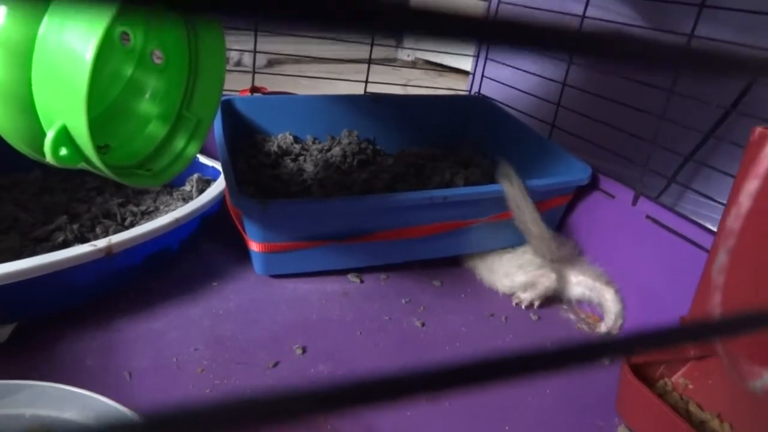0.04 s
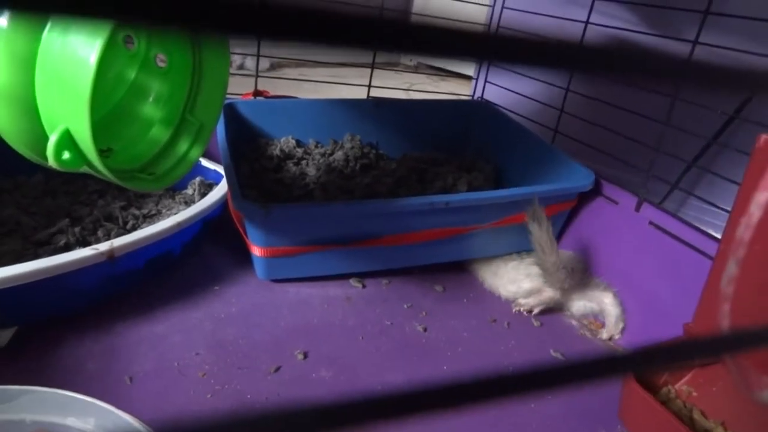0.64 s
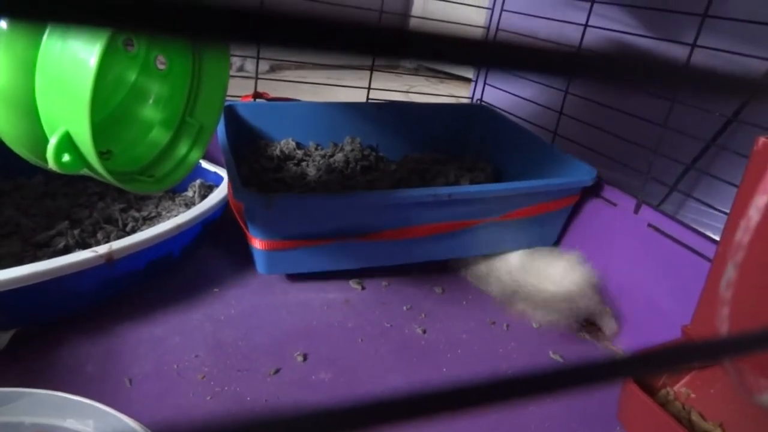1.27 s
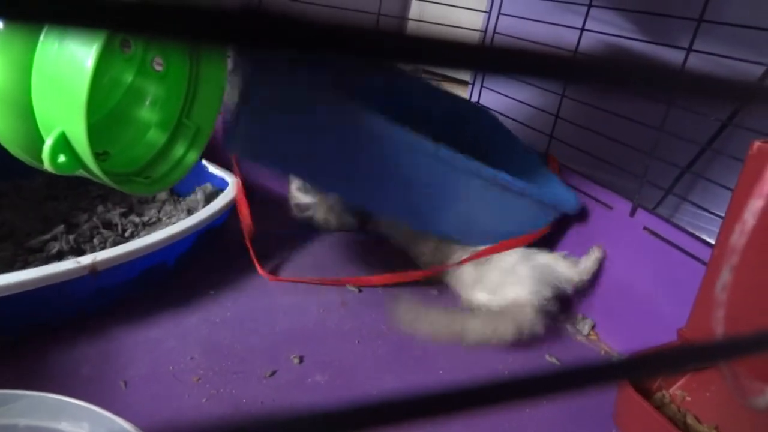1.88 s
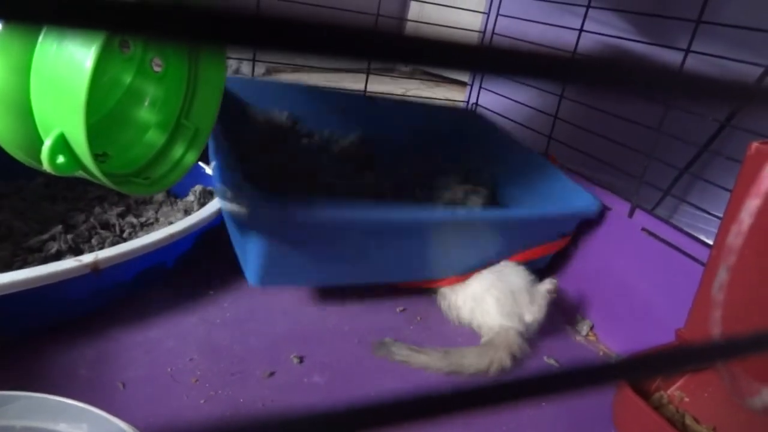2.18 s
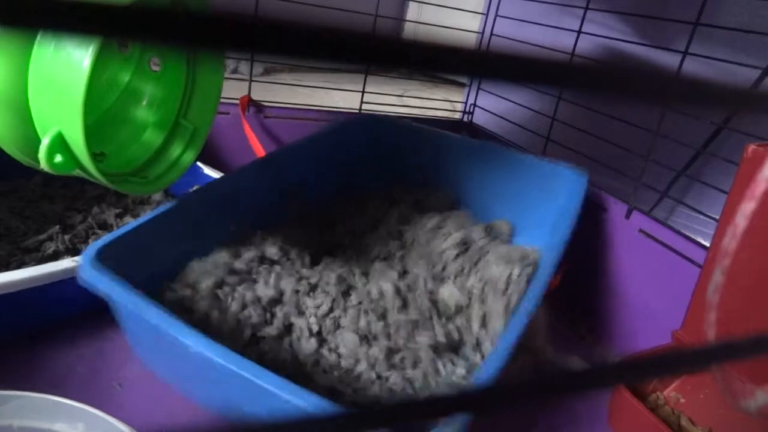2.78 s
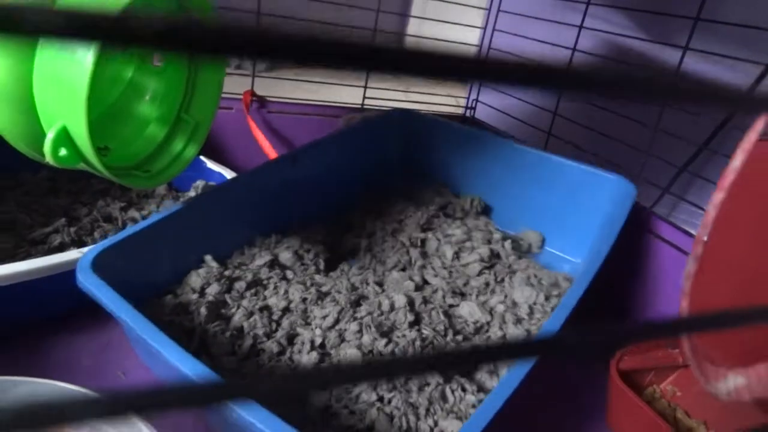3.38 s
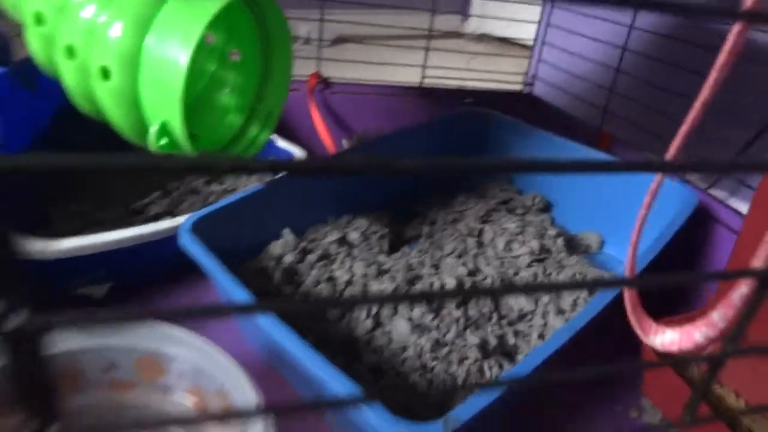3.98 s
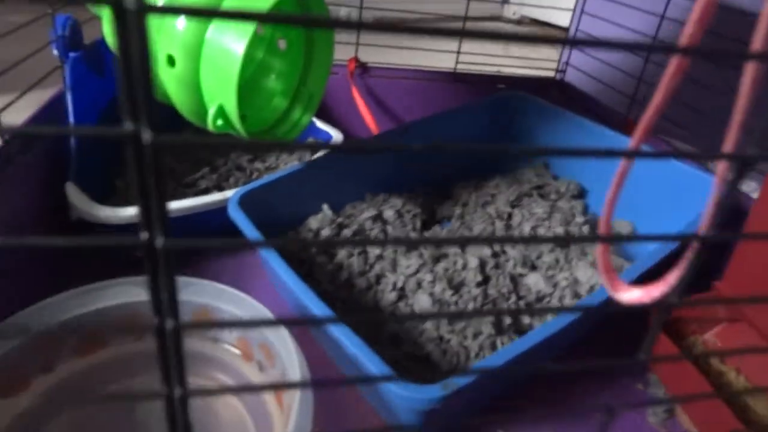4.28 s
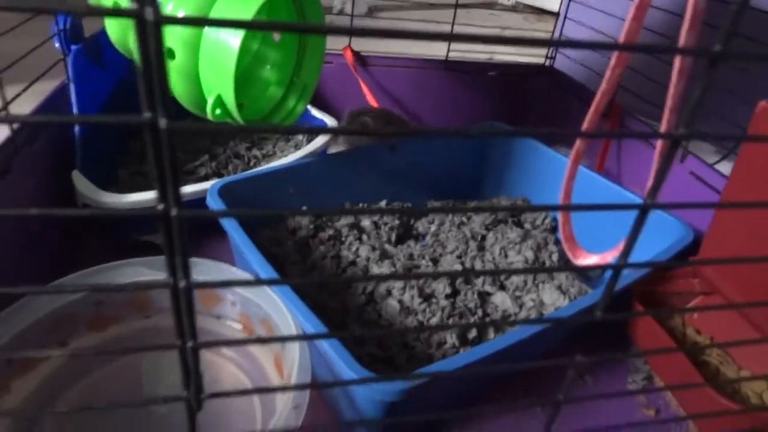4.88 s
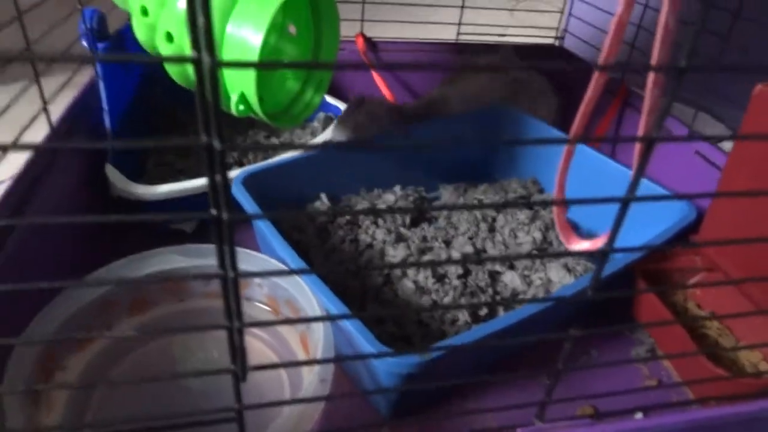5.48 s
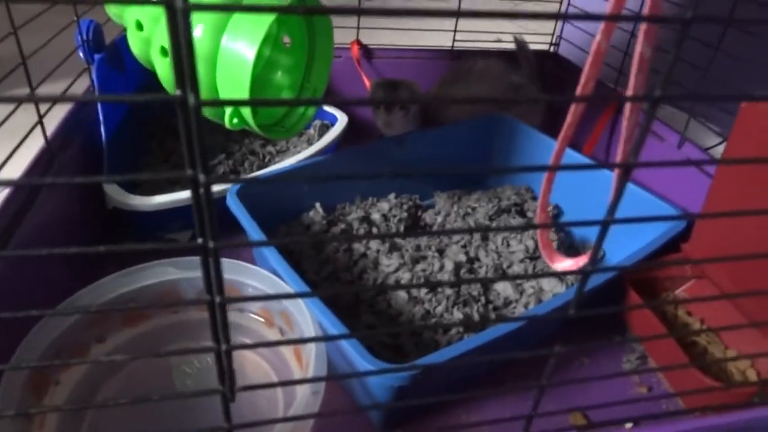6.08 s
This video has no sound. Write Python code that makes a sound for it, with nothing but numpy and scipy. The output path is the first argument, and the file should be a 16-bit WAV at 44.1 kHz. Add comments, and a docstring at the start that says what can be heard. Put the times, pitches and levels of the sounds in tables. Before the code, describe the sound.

A close microphone faces a wire cage in a fairly live room with a faint low hum. For the first 1.4 seconds a ferret's claws scratch lightly on the hollow cage floor and its body brushes a plastic litter tray. From about 1.4 to 2.1 seconds the tray gives dull knocks and small scrapes as it lifts. Between 2.1 and 3 seconds comes the loudest part: the tray drops, tips and skids, with sharp cracks, three heavy hollow knocks, juddering and rustling paper litter. It settles into scattered pellet ticks, soft knocks and short wire taps until about 4.2 seconds. From 4.2 to 4.9 seconds another shove makes the tray stick and slip over grit, with rim clacks and more rustling. Faint scraping, trickling litter, a brush and one small knock around 5.5 seconds fade away by 6 seconds.

```python
"""A plastic litter tray knocks and judders in a wire cage as a ferret squirms under it, lifts it, lets it
tumble and shoves it along. The tray sticks and slips on the gritty cage pan and cracks its rim on the cage;
paper litter rustles and ticks inside it. Claws scratch the hollow pan, dry taps sound on the bars near the
microphone, and the ferret's body brushes the plastic. A close stereo microphone stands just outside the bars,
facing the cage, in a fairly live room with a faint hum."""
import sys
import numpy as np
from scipy import signal
from scipy.fft import rfft, irfft, next_fast_len
from scipy.io import wavfile
from scipy.ndimage import uniform_filter1d, minimum_filter1d

SR = 44100
rng = np.random.default_rng(int(sys.argv[2]) if len(sys.argv) > 2 else 0)


def store_pcm(level_fs):
    """Save levels as 16-bit WAV."""
    pcm = np.round(np.clip(level_fs, -1, 1) * 32767).astype(np.int16)
    wavfile.write(sys.argv[1], SR, np.atleast_2d(pcm).T)


N = 270774
T = np.arange(N) / SR

# spectrum of a small, bright tick: frequency_hz, level_db
TICK_SPECTRUM = [(3000, -4), (6000, 4.5), (7500, 5), (10000, 4), (13000, 5.5), (16000, -6.5)]


def from_db(db):
    """Decibels to gain."""
    return 10 ** (np.asarray(db) / 20)


def rms_one(x):
    """Scale to unit rms."""
    return x / np.sqrt(np.mean(x ** 2) + 1e-20)


def peak_one(x, size=180):
    """Scale so that the loudest few milliseconds have unit rms."""
    return x / np.sqrt(uniform_filter1d(x * x, size).max())


def steady(x, size=1300):
    """Hold the strength of a sound even over a few hundredths of a second."""
    return x / np.sqrt(uniform_filter1d(x * x, size) + 1e-9)


def add(track, start_s, sound):
    """Mix a sound into a track."""
    start = max(round(start_s * SR), 0)
    track[..., start:start + sound.shape[-1]] += sound[..., :N - start]


def at_hz(points, hz):
    """Read a table on a log-frequency axis."""
    frequencies, values = np.transpose(points)
    return np.interp(np.log(np.maximum(hz, 1)), np.log(frequencies), values)


def colour(x, spectrum, size=4096):
    """Causal (minimum-phase) filter with the given spectrum and unit energy."""
    gain = from_db(at_hz(spectrum, np.fft.rfftfreq(size, 1 / SR)))
    cepstrum = irfft(np.log(gain))
    cepstrum[1:size // 2] *= 2
    cepstrum[size // 2 + 1:] = 0
    response = irfft(np.exp(rfft(cepstrum)))
    return signal.oaconvolve(x, response / np.linalg.norm(response))[:len(x)]


def resonate(x, hz, width_hz):
    """Two-pole resonance with gain 1 on top."""
    radius = np.exp(-np.pi * width_hz / SR)
    feedback = [1, -2 * radius * np.cos(2 * np.pi * hz / SR), radius ** 2]
    return signal.lfilter(np.array([1, 0, -1]) * (1 - radius ** 2) / 2, feedback, x + 1e-18)


def grains(per_s, spread_db, clump_db, clumps_per_s):
    """Tiny slips of uneven, bounded size that come in clumps; rms 1."""
    size_db = spread_db * rng.exponential(1, N)
    size_db += clump_db * np.interp(T * clumps_per_s, np.arange(N), rng.standard_normal(N))
    sizes = rng.choice([-1, 1], N) * from_db(np.minimum(size_db, 13))
    return rms_one(sizes * (rng.random(N) < per_s / SR))


def burst(t60, attack_s=0.0012, size=8192):
    """The dying chatter of one contact."""
    t = T[:size]
    return rng.standard_normal(size) * from_db(-60 * t / max(t60, .003)) * (1 - np.exp(-t / attack_s))


def strike(spectrum, t60):
    """One contact in two rows: the direct chatter, and a pulse of equal energy that excites the room."""
    direct = peak_one(colour(burst(t60), spectrum))
    pulse = colour(signal.unit_impulse(len(direct)), spectrum)
    return np.array([direct, np.linalg.norm(direct) * pulse])


def stroke(start, held, swell_s, fade_s):
    """A movement swells to full strength at its start time, holds and fades."""
    return np.exp(-np.maximum(start - T, 0) / swell_s - np.maximum(T - start - held, 0) / fade_s)


def room_tone(air_db=-49.5, hum_db=-51.5, hum_hz=119.6, waver_hz=5.7):
    """Soft room noise and a wavering hum."""
    # spectrum of the quiet room: frequency_hz, level_db
    air_spectrum = [(25, -46), (55, 3.5), (90, -4), (130, 3), (260, -5), (700, -15), (2000, -24.5),
                    (16000, -38)]
    hum = from_db(hum_db) * steady(resonate(rng.standard_normal(N), hum_hz, waver_hz))
    return from_db(air_db) * colour(rng.standard_normal(N), air_spectrum) + hum


def motion(floor_db=(-47, -58, -63.5), push_rustle_db=-10.5, settle_db=-19.5, settle_s=0.35):
    """Strength of pushes, spills and tumbles over a faint, steady floor; rows (judder, scrape, rustle)."""
    # the ferret pushes and the tray slides: full_force_s, held_s, judder_db, scrape_db
    pushes = [(0.14, 0.036, -40, -53), (0.84, 0.022, -37, -44.5), (1.16, 0.2, -39, -55),
              (1.5, 0.12, -43.5, -48.5), (1.849, 0.018, -27.5, -33), (3.6, 0.017, -34.5, -42.5),
              (3.88, 0.022, -32.5, -42), (4.412, 0.087, -16.5, -29.5), (4.53, 0.027, -20, -23),
              (4.74, .05, -36, -36), (5.04, 0.35, -43.5, -48)]
    # litter shifts and trickles: start_s, held_s, rustle_db
    spills = [(1.728, 0.27, -45.5), (2.053, 0.064, -48), (3.727, 0.056, -51), (4.02, .06, -49),
              (4.246, 0.52, -36), (4.912, 0.68, -47)]
    # the tray drops, tips and skids: start_s, judder_db, scrape_db, rustle_db, held_s, t60_s
    tumbles = [(2.169, -13.5, -20, -23.5, 0.059, 0.38), (2.434, -18.5, -31, -55, 0.045, 0.062),
               (2.498, -7.5, -23.5, -34.5, .11, 0.079), (2.655, -16.5, -25.5, -39, 0.064, 0.18),
               (2.808, -7, -22, -26.5, 0.071, 0.38)]
    power = np.outer(from_db(floor_db), np.ones(N)) ** 2
    for start, held, judder_db, scrape_db in pushes:
        force = stroke(start, held, swell_s=0.053, fade_s=0.11)
        power += np.outer(from_db([judder_db, scrape_db, scrape_db + push_rustle_db]), force) ** 2
    for start, held, rustle_db in spills:
        power[2] += (from_db(rustle_db) * stroke(start, held, swell_s=0.015, fade_s=0.02)) ** 2
    for start, judder_db, scrape_db, rustle_db, held, t60 in tumbles:
        after = np.maximum(T - start - held, 0)
        settling = from_db(settle_db) * np.exp(-after / settle_s)
        shape = (T >= start) * np.maximum(from_db(-60 * after / t60), settling)
        power += np.outer(from_db([judder_db, scrape_db, rustle_db]), shape) ** 2
    return np.sqrt(power)


def tray(force, wall_db=-25):
    """The tray rings in its modes over the broad, damped response of its walls."""
    # resonances of the tray on the cage pan: pitch_hz, width_hz, level_db
    modes = [(221.8, 19, 5), (277, 11.5, 0), (344.6, 9.1, 8.5), (403.6, 15.2, 4.5), (459.6, 10.6, 2),
             (530, 35, -2.5), (590.7, 21.3, 2.5), (678, 39, -2.5), (758, 10.6, 2.5), (797, 4.6, -1),
             (873, 46, -12.5), (977, 25, -11), (1085, 8.1, -20), (1166, 17, -5.5)]
    # response of the plastic walls: frequency_hz, level_db
    wall_spectrum = [(40, -35), (80, -17.5), (140, -17), (200, -10.5), (550, -4), (900, 1.5), (1300, -1.5),
                     (2500, -20), (6000, -115)]
    ring = sum((-1) ** k * from_db(db) * resonate(force, hz, width)
               for k, (hz, width, db) in enumerate(modes))
    return ring + from_db(wall_db) * colour(force, wall_spectrum)


def rim(scrape, width_hz=40):
    """Grit under the tray also sets the rim ringing."""
    # stiff upper modes of the rim: pitch_hz, gain_db
    modes = [(1400, -19), (1824, -17), (2126, -8), (2660, 2.5), (3170, -32), (3493, -2), (4215, 0)]
    return scrape + sum(from_db(db) * resonate(scrape, hz, width_hz) for hz, db in modes)


def sliding(judder_db=-6.0, scrape_db=-5.5, rustle_db=-7.0, crackle_db=-13.0):
    """Stick and slip shakes the tray, grit scratches the pan, pellets roll and snap on each other."""
    # spectra of grit on the pan and of paper litter: frequency_hz, level_db
    scrape_spectrum = [(400, -9), (1100, 2.5), (1500, 4.5), (2100, 4), (3100, 0), (5600, -6.5),
                       (8000, -31.5), (16000, -40)]
    rustle_spectrum = [(2500, -32), (5000, -12), (6400, 10.5), (8000, 9.5), (11000, 7), (15500, 3)]
    shaking, scraping, stirring = motion()
    slips = grains(per_s=1000, spread_db=4.0, clump_db=6.0, clumps_per_s=90)
    grit = grains(per_s=6000, spread_db=2.0, clump_db=2.0, clumps_per_s=170)
    crackle = from_db(crackle_db) * grains(per_s=80, spread_db=4.0, clump_db=-6.0, clumps_per_s=7.7)
    judder = steady(tray(slips), size=900)
    scrape = steady(rim(colour(grit, scrape_spectrum))) + colour(crackle, scrape_spectrum)
    rustle = steady(colour(grit, rustle_spectrum)) + colour(crackle, rustle_spectrum)
    return (from_db(judder_db) * shaking * judder
            + from_db(scrape_db) * scraping * scrape
            + from_db(rustle_db) * stirring * rustle)


def stray_pellets(level_db=-52, stir_exponent=0.41, t60=0.018):
    """Single pellets drop at random, the louder the more the litter is stirred."""
    rustle = motion()[2]
    drops = grains(per_s=55, spread_db=3.5, clump_db=-1.5, clumps_per_s=36)
    stirred = (rustle / rustle.max()) ** stir_exponent
    ticks = signal.oaconvolve(drops * (stirred - stirred.min()), burst(t60, attack_s=0.00038))[:N]
    return from_db(level_db) * rms_one(colour(ticks, TICK_SPECTRUM))


def click(treble_db, body_db, t60):
    """A hard contact: a clack of plastic, a bright tick and a hollow note of the cage pan."""
    # spectra of struck plastic and of the pan: frequency_hz, level_db
    clack_spectrum = [(400, -1.5), (1200, 2.5), (2200, 1.5), (3300, 6), (4500, 1.5), (6500, -1.5),
                      (9000, -11), (16000, -24.5)]
    pan_spectrum = [(80, -16.5), (200, -1.5), (320, 0.5), (430, 0.5), (600, 8.5), (800, 2), (1100, -5),
                    (2500, -7), (6000, -52.5)]
    clack = from_db(-4.5) * strike(clack_spectrum, t60)
    tick = from_db(treble_db + 3.5) * strike(TICK_SPECTRUM, 0.87 * t60)
    thud = from_db(body_db + 2.5) * strike(pan_spectrum, t60)
    return clack + tick + thud


def hard_contacts():
    """Claws, pellets and the rim each click with a touch of their own; rows (direct, to the room)."""
    # claws scratch on the hollow pan: start_s, level_db, t60_s
    scratches = [(0.054, -34, .018), (0.1326, -35, 0.092), (0.3414, -44, 0.089), (0.3561, -38.5, 0.023),
                 (0.5457, -40.5, 0.13), (0.7791, -44, 0.3), (0.8604, -36, 0.058), (2.501, -27.5, 0.036),
                 (3.0704, -37.5, 0.04), (3.3946, -30.5, 0.032), (4.2463, -37, 0.18), (4.2839, -31.5, 0.095),
                 (5.458, -41, 0.16)]
    # loose pellets tick on the plastic: start_s, level_db, treble_db
    pellets = [(1.4839, -36, 2), (1.8426, -33.5, -7), (3.372, -31, -7.5), (3.682, -35, -7),
               (3.7301, -25.5, -1), (3.7995, -39, 9.5), (3.813, -30.5, -5), (4.798, -37, 5.5),
               (4.859, -27, -7), (4.9548, -33, -6.5), (5.2426, -35, -11)]
    # the tray's rim cracks against the cage: start_s, level_db, body_db
    cracks = [(1.7422, -22, -4), (1.8048, -29, 3), (2.0941, -18, -21), (2.0999, -15, -28),
              (2.16, -1.5, -11.5), (2.614, -7, 0.5), (2.7996, -12, -7), (2.8907, -18.5, 6),
              (4.366, -16.5, -9.5), (4.435, -30, 5), (4.5088, -15.5, -5.5), (4.535, -22, 0),
              (4.6817, -21.5, -7.5)]
    out = np.zeros((2, N))
    for start, db, t60 in scratches:
        add(out, start, from_db(db) * click(treble_db=-6, body_db=-1.5, t60=t60))
    for start, db, treble_db in pellets:
        add(out, start, from_db(db) * click(treble_db, body_db=-16, t60=0.017))
    for start, db, body_db in cracks:
        add(out, start, from_db(db) * click(treble_db=-18, body_db=body_db, t60=0.031))
    return out


def wire_taps(gain_db=1.5, t60=0.023):
    """Short, damped taps on the cage bars close to the microphone; rows (direct, to the room)."""
    # dry taps on the cage: start_s, level_db
    taps = [(0.0997, -43), (0.71, -40), (1.5486, -44), (1.6817, -30), (3.6164, -26.5), (4.0142, -33.5),
            (4.064, -39), (4.1127, -25.5), (4.1905, -31), (4.574, -25), (4.586, -26.5), (4.7684, -30.5)]
    # spectrum of the taps on the bars: frequency_hz, level_db
    tap_spectrum = [(300, 5.5), (1800, -2), (2400, -3), (3300, 1), (4200, -1.5), (6000, -11.5), (9000, -20),
                    (16000, -28)]
    out = np.zeros((2, N))
    for start, db in taps:
        add(out, start, from_db(db + gain_db) * strike(tap_spectrum, t60))
    return out


def body_scuffs():
    """The ferret's body brushes along the plastic, swells to a gritty hiss and lets go."""
    # brushes against the tray: peak_s, level_db, swell_s, fade_s
    brushes = [(0.896, -37.5, 0.017, 0.032), (1.125, -41, 0.042, 0.071), (1.265, -31.5, 0.042, 0.059),
               (3.248, -37, 0.039, 0.037), (4.58, -29.5, 0.013, 0.021), (5.311, -31.5, 0.04, 0.031)]
    # spectrum of the brushing: frequency_hz, level_db
    scuff_spectrum = [(600, 0.5), (1400, -2), (2300, 2.5), (4500, -2.5), (8000, -4), (12500, -3.5),
                      (16000, -14.5)]
    pressure = sum(from_db(db) * np.exp(-np.maximum((peak - T) / swell, (T - peak) / fade))
                   for peak, db, swell, fade in brushes)
    friction = grains(per_s=21000, spread_db=3.0, clump_db=4.5, clumps_per_s=200)
    return pressure * steady(colour(friction, scuff_spectrum))


def tray_knocks(gain_db=1.5, contact_t60=0.012, flex_t60=0.061, rattle_t60=0.13, rattle_width_hz=700):
    """A wall flexes with one short note, and the whole tray rattles after it."""
    # dull knocks of the tray: start_s, level_db, pitch_hz, rattle_over_note_db
    knocks = [(1.377, -35.5, 374, -4), (1.545, -38, 343, 4), (1.684, -18.5, 490, -19),
              (1.802, -26.5, 265, -5), (1.84, -24, 499, -9), (1.935, -29.5, 264, -1), (2.133, -23, 213, 5),
              (2.164, -7.5, 652, -7), (2.428, -10, 424, 3), (2.8, -4, 600, -1.5), (3.215, -26, 520, -1),
              (3.503, -31, 533, -36), (3.564, -27, 414, -9.5), (4.208, -32.5, 347, 12),
              (4.365, -28, 960, -6), (4.684, -24.5, 356, 20.5), (5.458, -30, 348, -6.5)]
    push = from_db(-60 * T[:8192] / contact_t60)
    flex_width_hz = np.log(1000) / np.pi / flex_t60
    out = np.zeros(N)
    for start, db, hz, rattle_db in knocks:
        flex = peak_one(resonate(push, hz, flex_width_hz))
        rattle = peak_one(resonate(tray(burst(rattle_t60)), hz, rattle_width_hz))
        add(out, start, from_db(db + gain_db) * peak_one(flex + from_db(rattle_db) * rattle))
    return out


def room_reverb(send, build_s=0.0023, size=40000, bands=8):
    """Diffuse reflections build up and die band by band."""
    # decay of the room: frequency_hz, t60_s
    decay = [(150, 0.73), (600, 0.62), (3000, 0.51), (8000, 0.45), (15000, 0.21)]
    edges = np.geomspace(80, 17000, bands + 1)
    t, tail = T[:size], np.zeros(size)
    for low, high in zip(edges, edges[1:]):
        band_pass = signal.butter(2, [low, high], "band", fs=SR, output="sos")
        band = signal.sosfilt(band_pass, rng.standard_normal(size))
        tail += band * from_db(-60 * t / at_hz(decay, np.sqrt(low * high)))
    tail *= 1 - np.exp(-t / build_s)
    return signal.oaconvolve(send, tail / np.linalg.norm(tail))[:N]


def limit(x, ceiling=0.5, size=130):
    """A quick limiter ducks for a few milliseconds around each loud peak."""
    gain = np.minimum(1, ceiling / (np.abs(x).max(axis=0) + 1e-9))
    return x * uniform_filter1d(minimum_filter1d(gain, size), size)


def scene(click_room_db=-4.0, knock_room_db=-7.5, tap_room_db=-7.5, rub_room_db=-11.0, width_db=-22.0):
    """The cage is close and straight ahead of the microphone; only the room has some width."""
    clicks, click_send = hard_contacts()
    taps, tap_send = wire_taps()
    knocks = tray_knocks()
    rubs = sliding() + body_scuffs()
    send = (from_db(click_room_db) * click_send + from_db(knock_room_db) * knocks
            + from_db(tap_room_db) * tap_send + from_db(rub_room_db) * rubs)
    mid = clicks + knocks + taps + rubs + stray_pellets() + room_reverb(send) + room_tone()
    side = from_db(width_db) * room_reverb(send)
    return np.array([mid + side, mid - side])


def record(dry, cutoff_hz=16000):
    """Two close microphone ports differ a little in phase; peaks are limited and the top is cut."""
    # phase of the left port against the right: frequency_hz, lead_rad
    port_lead = [(60, -0.031), (500, -0.47), (1500, -0.49), (4000, -0.38), (12000, -0.051)]
    size = next_fast_len(N + 4096)
    lead = at_hz(port_lead, np.fft.rfftfreq(size, 1 / SR))
    phase_shift = np.exp(.5j * lead * np.array([[1], [-1]]))
    ports = irfft(rfft(dry, size) * phase_shift, size)[:, :N]
    low_pass = signal.ellip(10, .2, 80, cutoff_hz, fs=SR, output="sos")
    return signal.sosfilt(low_pass, limit(ports))


dry = scene()
out = record(dry)
store_pcm(out)
```